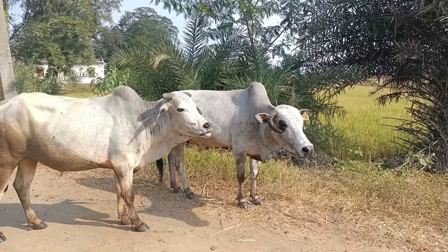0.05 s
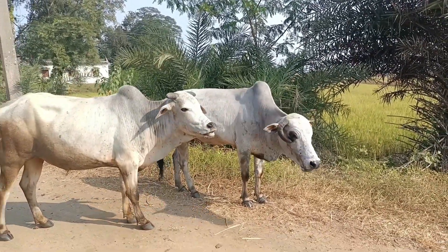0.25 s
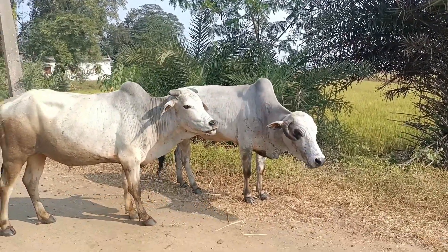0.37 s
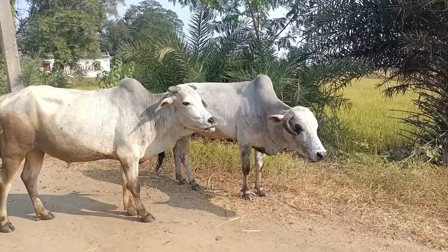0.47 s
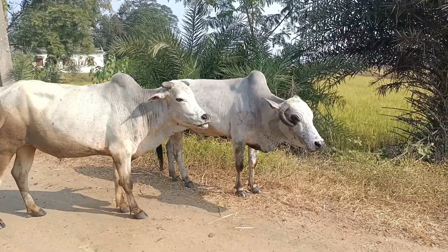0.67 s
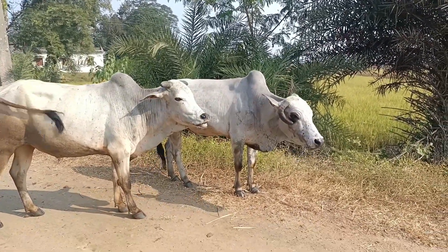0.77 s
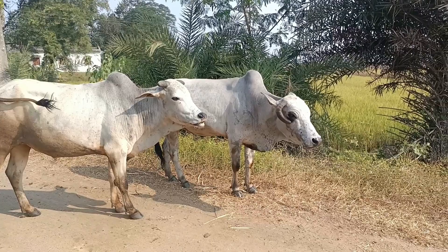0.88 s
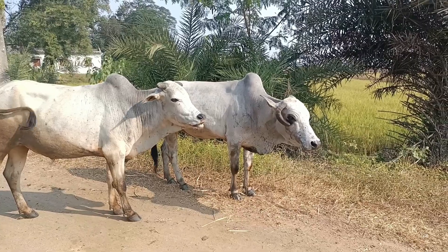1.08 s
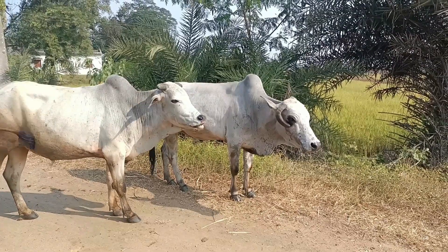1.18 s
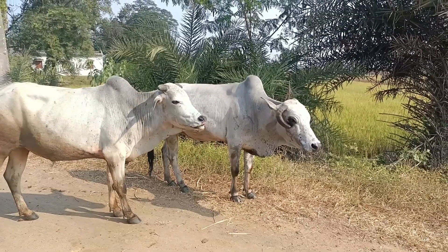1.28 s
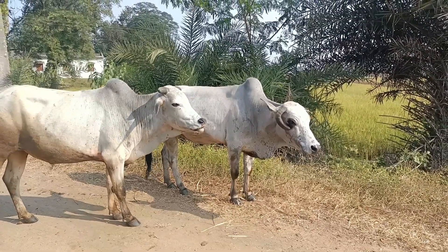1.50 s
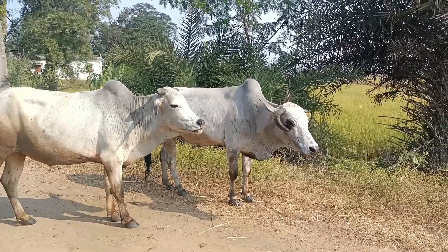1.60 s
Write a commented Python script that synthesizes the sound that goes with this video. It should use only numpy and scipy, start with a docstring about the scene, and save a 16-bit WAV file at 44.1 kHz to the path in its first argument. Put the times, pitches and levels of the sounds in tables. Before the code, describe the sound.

After faint dry straw rustles, a bull snorts and lets out one coarse, rattling bellow close to an overloaded microphone, its throbs dying away into steady low rumble and hiss in the open air.

```python
"""Outdoors, close to the microphone: a bull gives one rough, snorting bellow.
Noise through nostril resonances makes the snort; uneven slaps and air puffs ring chest, throat, palate and muzzle.
Heavy throbs, each sagging slightly in pitch, grow weaker as the call dies away.
The loud part overloads the recorder. The left ear is dull.
Short noise bursts make faint dry straw rustles; wobbling sines make a low drone under an even hiss."""
import sys
import numpy as np
from scipy import signal
from scipy.fft import rfft, irfft
from scipy.io import wavfile
from scipy.ndimage import uniform_filter1d

SR = 44100
rng = np.random.default_rng(int(sys.argv[2]) if len(sys.argv) > 2 else 0)


def unload_wav(signal):
    """Save mono or channel-first audio to the path in sys.argv[1] as 16-bit WAV at rate SR, clipped to [-1, 1]."""
    wavfile.write(
        sys.argv[1],
        SR,
        np.round(np.clip(np.atleast_2d(signal).T, -1, 1) * 32767).astype(np.int16),
    )


N = 72765
T = np.arange(N) / SR
HZ = np.fft.rfftfreq(N, 1 / SR)

# Steady lines of the drone, like a distant engine. Each row: frequency in Hz, rms level in dB.
DRONE_LINES = [(41.2, -31), (49, -41), (82.3, -35.5), (92.7, -32.5), (161.5, -44)]
# Background hiss in each ear. Each row: frequency in Hz, density in dB per Hz.
HISS_LEFT = [(20, -67), (60, -59), (120, -57.5), (165, -60.5), (250, -68), (400, -76.5), (800, -86),
             (1500, -89), (3700, -102), (5200, -106), (6800, -117), (9000, -111), (12500, -107),
             (15500, -120)]
HISS_RIGHT = [(20, -73), (60, -47), (120, -58), (165, -55), (250, -67), (400, -68.5), (850, -78.5),
              (1500, -74), (2400, -80), (4000, -89.5), (4500, -77.5), (5100, -76), (6000, -81.5),
              (7200, -86), (8500, -100), (9800, -114), (11000, -112), (12500, -96.5), (15500, -95.5)]
# Likeness of the hiss in the two ears. Each row: frequency in Hz, correlation from 0 to 1.
EAR_LIKENESS = [(20, 1), (100, 0.76), (160, 0.18), (300, 0.084), (600, 0), (16000, 0)]
# Straw rustles. Each row: start in seconds, level in dB, decay in seconds, centre in Hz, width in Hz.
RUSTLES = [(0.002, -26.5, 0.039, 4300, 386), (0.019, -30.5, 0.02, 4160, 700),
           (0.021, -26, 0.0086, 2400, 900), (0.05, -39.5, 0.12, 5200, 704), (0.739, -32, .007, 5000, 2200),
           (0.817, -37, .005, 3900, 1200), (0.817, -37.5, 0.0058, 6900, 1200)]
# Shading of the left microphone. Each row: frequency in Hz, gain in dB.
LEFT_SHADE = [(60, 17.5), (200, -3.5), (400, -3.5), (780, -12.5), (1100, -13.5), (1600, -16.5),
              (2200, -17.5), (3200, -27.5), (4500, -40.5), (7500, -55), (15000, -60)]
# Resonances of the nostrils. Each row: centre in Hz, width in Hz, level in dB.
NOSTRIL_MODES = [(531, 170, 3), (1390, 300, -1.5), (2320, 720, -35), (3360, 200, -9), (4420, 190, 1),
                 (5700, 250, -1), (7500, 640, -1.5), (13500, 2000, -9.5)]
# Strongest throbs of the throat. Each row: centre in seconds, level in dB, ring pitch in Hz, length in seconds.
THROBS = [(0.255, -1.5, 200, .022), (0.298, 3.5, 192, 0.015), (0.324, 3, 238.3, .016),
          (0.349, 5, 270.9, 0.0217), (0.374, -0.5, 253.8, 0.0088), (0.4, 2.5, 199.5, 0.0107),
          (0.428, 2.5, 193.9, 0.013), (0.446, 2, 222, 0.0089), (0.499, 1.5, 239, 0.0099),
          (0.53, -5.5, 216.4, 0.017), (0.561, -9, 225, 0.023), (0.611, -10, 230.7, 0.019),
          (0.654, -8, 214, 0.017), (0.693, -12, 227.4, 0.015), (0.712, -15.5, 230, 0.01)]
# Sharp blasts of air through the throat. Each row: centre in seconds, boost in dB, length in seconds.
BLASTS = [(0.266, 5.5, 0.011), (0.322, 5, 0.0038), (0.365, 7.5, 0.0075), (0.44, 7.5, 0.0057),
          (0.499, 7, 0.0037), (0.576, 2, 0.0069)]
# Mouth opening. Each row: time in seconds, factor on the throat and palate resonances.
MOUTH_OPENING = [(0.25, 0.85), (0.285, 0.97), (0.33, 0.98), (0.368, 1.03), (0.44, 0.995), (0.75, 1.01)]
# Level curves: low rattle between the throbs, throat rasp, bright ring under the palate, air rushing
# through the muzzle, nose whistles. Each row: time in seconds, level in dB.
RATTLE_LEVEL = [(0.222, -36), (0.24, -17.5), (0.28, -10), (0.42, -12), (0.48, -18), (0.58, -27),
                (0.70, -31), (0.735, -40.5), (0.80, -47)]
RASP_LEVEL = [(0.226, -31), (0.246, -12.5), (0.262, -4.5), (0.30, -9), (0.365, -10.5), (0.44, -12),
              (0.52, -18.5), (0.60, -22.5), (0.70, -24.5), (0.755, -28.5), (0.82, -44.5)]
RING_LEVEL = [(0.24, -32), (0.28, -2), (0.30, -19.5), (0.335, -6), (0.352, -24.5), (0.378, -8),
              (0.42, -16.5), (0.52, -26), (0.60, -32), (0.70, -39.5), (0.76, -59)]
AIR_LEVEL = [(0.222, -32.5), (0.255, -20.5), (0.32, -17.5), (0.37, -17.5), (0.44, -21), (0.49, -25.5),
             (0.55, -37.5), (0.61, -44), (0.76, -56)]
WHISTLE_LEVEL = [(0.36, -38), (0.45, -21), (0.55, -27), (0.68, -38.5), (0.76, -51)]
# Resonances of the body; the last are narrow nose whistles. Each row: centre in Hz, width in Hz, level in dB.
CHEST_MODES = [(167, 45.4, 3), (235, 83, -5.5), (288.7, 36.6, 5)]
THROAT_MODES = [(643, 420, -12.5), (781, 137, 2), (961, 138, -5), (1101.6, 97, -7)]
PALATE_MODES = [(1401, 106, -6), (1530, 127, -2.5), (1641, 43, -8)]
MUZZLE_MODES = [(2230, 520, -2), (2790, 320, -4), (3180, 350, -2), (3850, 540, -6), (4380, 240, 0),
                (5250, 440, -7.5), (6220, 800, -9), (7200, 890, -8), (8540, 640, -18), (12500, 1600, -15),
                (14300, 1400, -11.5)]
WHISTLE_MODES = [(1073, 170, 1), (1974, 130, -2.5), (2940, 240, -1), (3224, 120, -7), (4300, 260, -7),
                 (7420, 266, -12)]

DRONE_WOBBLE, DRONE_WOBBLE_HZ = 0.0036, 3.45  # rms fraction of pitch, speed
SWELL_DB, SWELL_HZ = 0.7, 5.8  # gusts of the far background
LEFT_LAG_S, GROUND_DB, GROUND_T60_S = 0.0004, -8, 0.091
SNORT_S, SNORT_RISE_S, SNORT_HOLD_S, SNORT_FALL_S, SNORT_DB = 0.2152, 0.018, 0.049, 0.003, -13
SPIT_S, SPIT_LENGTH_S, SPIT_HZ, SPIT_WIDTH_HZ, SPIT_DB = 0.263, 0.003, 7050, 610, -4.5
FLAPS_PER_S, FLAP_JITTER, FLAP_DECAY_S, FLAP_FLOOR = 85, 0.45, 0.0061, 0.53
THROB_PUFF, PUFF_LEAD_S, THROB_SAG = 0.27, 0.0074, 0.06
FIRMNESS = 0.4  # 0 = free noisy ringing, 1 = self-sustained at an even level
FULL_SCALE, EDGE_HZ = 1.0, 15600


def amp(db):
    """Decibels to gain."""
    return 10 ** (np.asarray(db) / 20)


def unit(x):
    """Scales to rms 1."""
    return x / np.sqrt(np.mean(abs(x) ** 2) + 1e-20)


def level(points):
    """Gain over time from a dB curve; -120 dB outside it."""
    return amp(np.interp(T, *np.transpose(points), left=-120, right=-120))


def read(points):
    """A table over log frequency, read at every bin."""
    f_hz, value = np.transpose(points)
    return np.interp(np.log(HZ + 1), np.log(f_hz), value)


def bump(offset):
    """Gaussian pulse; offset from its centre is in pulse lengths."""
    return np.exp(-(2 * offset) ** 2)


def wander(speed_hz):
    """Slow random drift of rms 1: noise under a Gaussian low-pass."""
    return unit(irfft(rfft(rng.standard_normal(N)) * np.exp(-(HZ / speed_hz) ** 2), N))


def resonate(x, hz, width_hz):
    """Two-stage resonance that may move: shift to 0 Hz, low-pass, shift back; complex output."""
    turn = np.exp(2j * np.pi * np.cumsum(hz * np.ones(N)) / SR)
    r = np.exp(-np.pi * width_hz / SR)
    return turn * signal.lfilter([(1 - r) ** 2], [1, -2 * r, r * r], x / turn)


def cavity(x, modes, opening=1, firmness=0):
    """Parallel resonances of alternating sign; firmness evens out their level; rms 1."""
    z = 0
    for k, (hz, width_hz, db) in enumerate(modes):
        z = z + (-1) ** k * amp(db) * unit(resonate(x, hz * opening, width_hz))
    power = uniform_filter1d(abs(unit(z)) ** 2, size=200) + 0.05
    return unit(z.real / power ** (np.clip(firmness, 0, 1) / 2))


def drone():
    """Low sine lines that share one pitch wobble."""
    speed = 1 + DRONE_WOBBLE * wander(DRONE_WOBBLE_HZ)
    seconds = np.cumsum(speed) / SR
    return sum(amp(db) * np.sqrt(2) * np.sin(2 * np.pi * (hz * seconds + rng.random()))
               for hz, db in DRONE_LINES)


def hiss():
    """Shaped noise, partly shared between the ears, swelling slightly."""
    a, b = rfft(rng.standard_normal((2, N))) * np.sqrt(SR / 2)
    same = np.clip(read(EAR_LIKENESS), -1, 1)
    left = (same * a + np.sqrt(1 - same ** 2) * b) * amp(read(HISS_LEFT))
    right = a * amp(read(HISS_RIGHT))
    return irfft(np.array([left, right]), N) * amp(SWELL_DB * wander(SWELL_HZ))


def background():
    """Drone alike in both ears, under wide hiss."""
    return drone() + hiss()


def straw():
    """Short dry rustles: decaying, flickering bands of noise."""
    sound = np.zeros(N)
    for start_s, db, decay_s, hz, width_hz in RUSTLES:
        decay = (T > start_s) * np.exp(-abs(T - start_s) / decay_s)
        flicker = amp(1.7 * wander(120))
        band = unit(resonate(rng.standard_normal(N), hz, width_hz).real)
        sound += amp(db) * decay * flicker * band
    return sound


def snort():
    """A short whistling jet through the narrow nostrils opens the call and ends in a sharp spit."""
    t = T - SNORT_S
    shape = np.clip(t / SNORT_RISE_S, 0, 1) * np.exp(-np.maximum(t - SNORT_HOLD_S, 0) / SNORT_FALL_S)
    turbulence = rng.standard_normal(N) * amp(2.0 * wander(240))
    jet = amp(SNORT_DB) * shape * cavity(turbulence, NOSTRIL_MODES)
    spit = unit(resonate(rng.standard_normal(N), SPIT_HZ, SPIT_WIDTH_HZ).real)
    return jet + amp(SPIT_DB) * bump((T - SPIT_S) / SPIT_LENGTH_S) * spit


def flaps():
    """Uneven slaps of the slack throat tissue, and the decaying puffs of air that they let through."""
    turns = np.cumsum(FLAPS_PER_S * np.exp(FLAP_JITTER * wander(60))) / SR
    slaps = np.diff(np.floor(turns), prepend=0) * rng.uniform(0.54, 1, N)
    puffs = signal.lfilter([1], [1, -np.exp(-1 / (FLAP_DECAY_S * SR))], slaps)
    return slaps, FLAP_FLOOR + puffs


def throbs():
    """Heavy surges of a few sagging cycles each, and the push of air just ahead of them."""
    sound, push = np.zeros(N), np.zeros(N)
    for centre_s, db, hz, length_s in THROBS:
        u = (T - centre_s) / length_s
        turns = np.cumsum(hz * (1 - THROB_SAG * np.tanh(u))) / SR
        sound += amp(db) * bump(u) * np.sin(2 * np.pi * (turns + rng.random()))
        push += bump(u + PUFF_LEAD_S / length_s)
    return sound, push


def bellow():
    """Slaps ring the chest; slaps and puffs of air excite throat and palate, puffs alone muzzle and nose."""
    slaps, puffs = flaps()
    heavy, push = throbs()
    throat_air, palate_air, muzzle_air, nose_air = rng.standard_normal((4, N)) * puffs
    mouth = np.interp(T, *np.transpose(MOUTH_OPENING))
    blast_db = sum(db * bump((T - centre_s) / length_s) for centre_s, db, length_s in BLASTS)
    surge = (1 + THROB_PUFF * push) * amp(blast_db)
    rattle = level(RATTLE_LEVEL) * cavity(slaps, CHEST_MODES, firmness=FIRMNESS)
    rasp = level(RASP_LEVEL) * cavity(unit(throat_air) + unit(slaps), THROAT_MODES, mouth, FIRMNESS)
    ring = level(RING_LEVEL) * cavity(unit(palate_air) + unit(slaps), PALATE_MODES, mouth, FIRMNESS)
    air = level(AIR_LEVEL) * cavity(muzzle_air, MUZZLE_MODES)
    whistle = level(WHISTLE_LEVEL) * cavity(nose_air, WHISTLE_MODES)
    return heavy + rattle + surge * (rasp + ring + air) + whistle


def place(x):
    """Faint scatter from ground and bushes; the left ear hears the sound later and duller."""
    scatter = rng.standard_normal((2, N)) * amp(-60 * T / GROUND_T60_S) * (T > 0.002)
    paths = 1 + amp(GROUND_DB) * rfft(scatter / np.linalg.norm(scatter[0]))
    paths[0] *= amp(read(LEFT_SHADE)) * np.exp(-2j * np.pi * HZ * LEFT_LAG_S)
    return irfft(rfft(x) * paths, N)


def scene():
    """The bull and the straw in front of the background."""
    return background() + place(straw() + snort() + bellow())


def record(dry):
    """Hard overload, then the band limit."""
    clipped = np.clip(dry, -FULL_SCALE, FULL_SCALE)
    lowpass = signal.firwin(511, EDGE_HZ, window=("kaiser", 9), fs=SR)
    return signal.oaconvolve(clipped, lowpass[None], "same", axes=1)


dry = scene()
out = record(dry)
unload_wav(out)
```